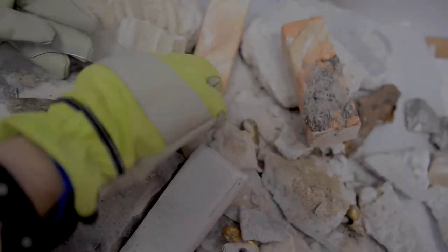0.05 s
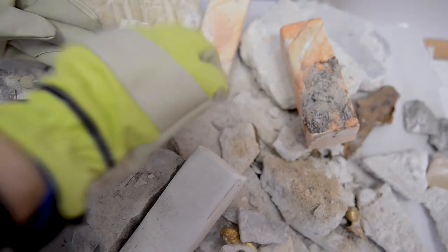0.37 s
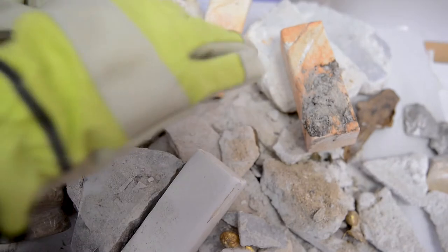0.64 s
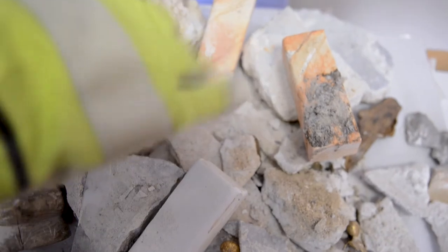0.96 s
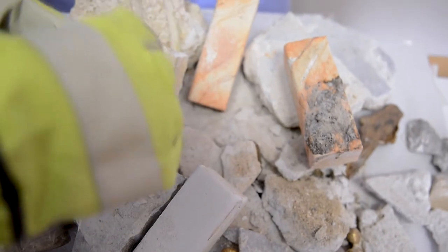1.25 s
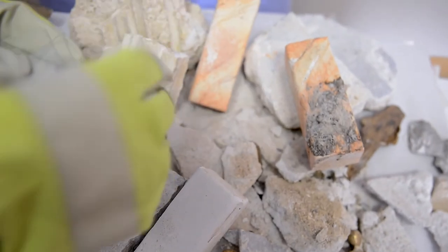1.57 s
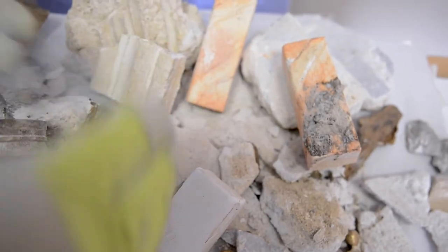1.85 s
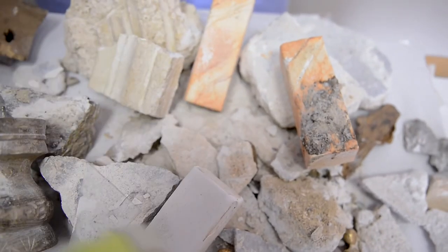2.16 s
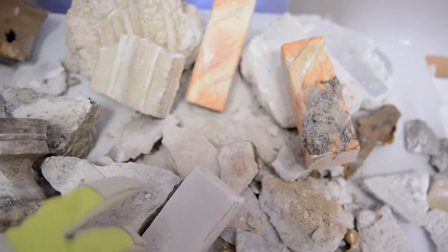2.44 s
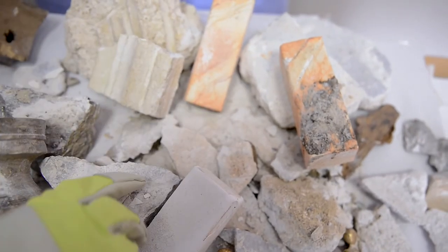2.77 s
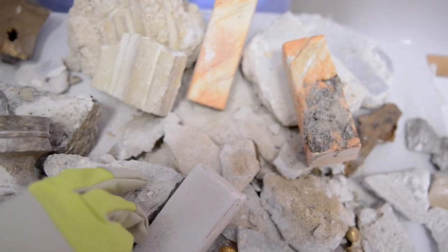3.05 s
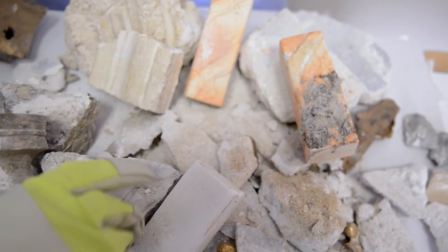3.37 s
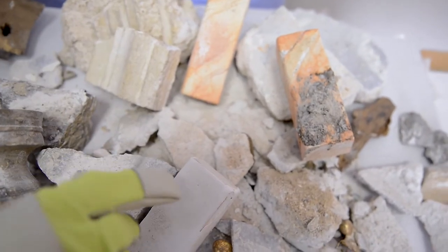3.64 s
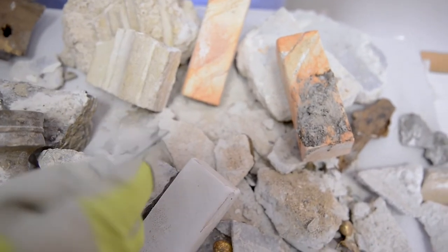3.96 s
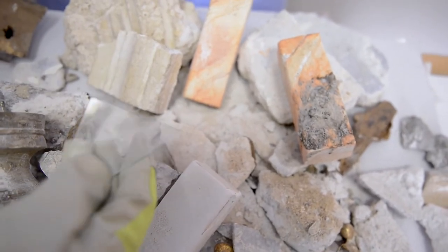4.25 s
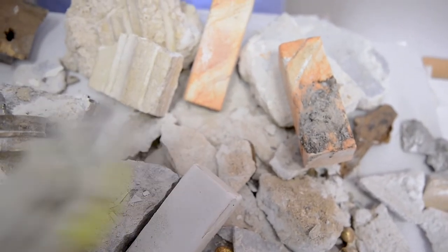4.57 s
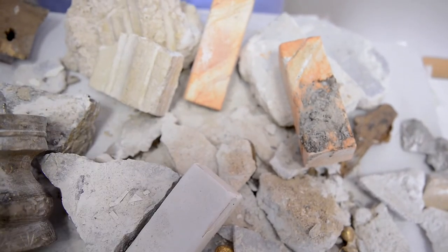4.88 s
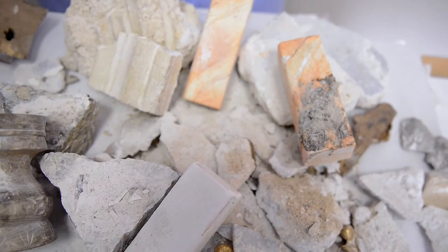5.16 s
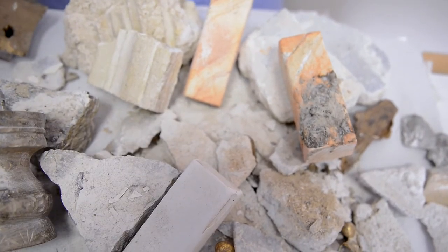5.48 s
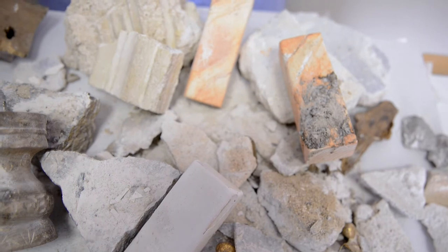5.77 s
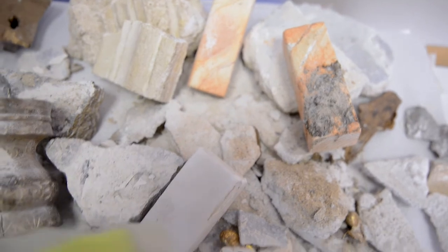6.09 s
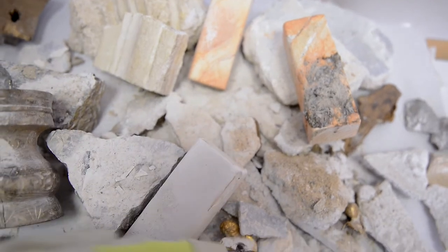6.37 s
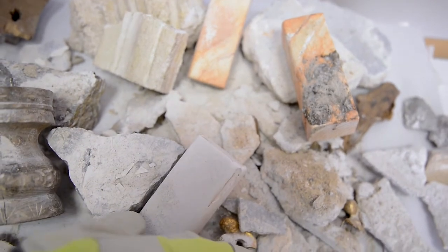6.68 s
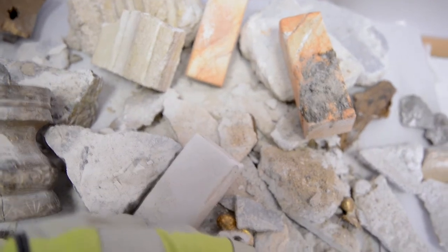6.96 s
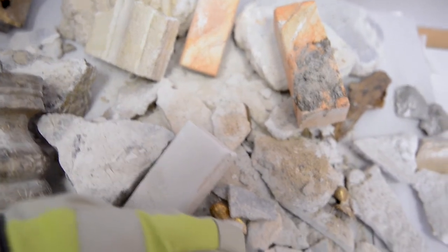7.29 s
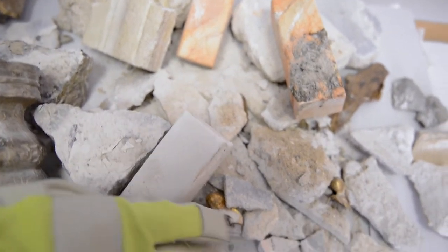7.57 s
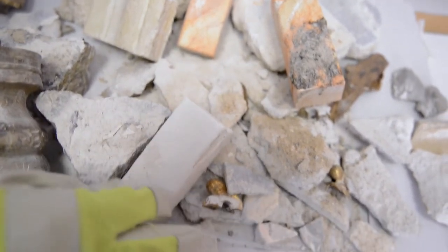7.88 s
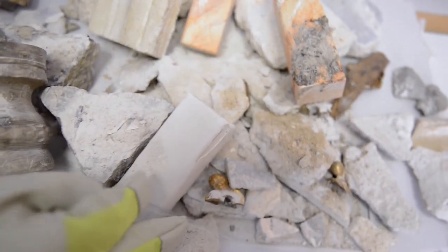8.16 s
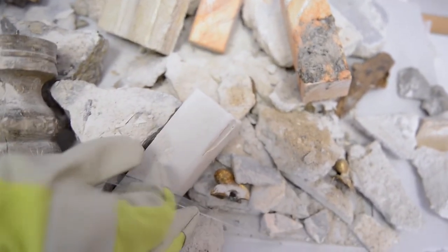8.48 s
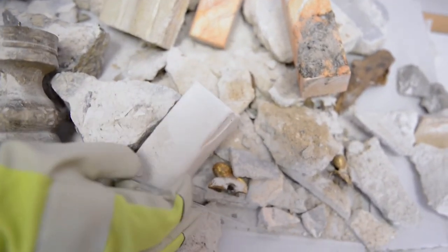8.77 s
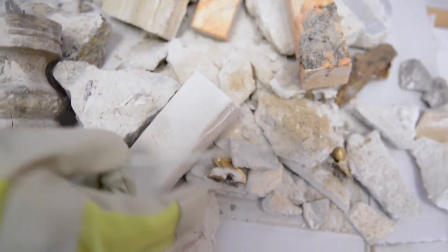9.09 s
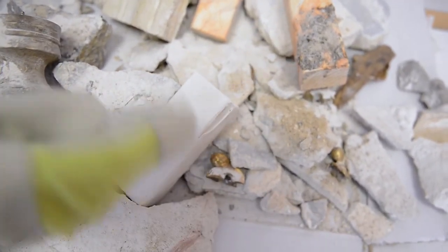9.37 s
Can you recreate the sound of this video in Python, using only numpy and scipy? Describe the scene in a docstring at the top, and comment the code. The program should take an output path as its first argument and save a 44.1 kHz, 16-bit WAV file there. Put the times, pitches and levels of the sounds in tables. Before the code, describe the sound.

Broken brick and plaster clack, clatter and scrape close by as a gloved hand sorts rubble in a tub.

```python
"""Sharp clacks and gritty scrapes, close by in a small room: a gloved hand sorts rubble in a tub.
Broken brick, tile and plaster knock together, crushing grains and ringing briefly; some bounce once.
Dropped pieces land, rock and skid to rest, and dragged ones rasp as their rough faces catch and slip.
Behind them the glove rustles, the tub booms softly when it is bumped, and the room hisses faintly."""
import sys
import numpy as np
from scipy import signal
from scipy.fft import rfft, irfft
from scipy.io import wavfile

SR = 44100
rng = np.random.default_rng(int(sys.argv[2]) if len(sys.argv) > 2 else 0)


def materialize(psi):
    """Save the field psi as 16-bit PCM at rate SR to the path in sys.argv[1].

    A 1-D psi becomes a single channel; in a 2-D psi each row is a channel.
    """
    bounded = np.clip(np.atleast_2d(psi).T, -1, 1)
    quanta = np.round(bounded * 32767).astype(np.int16)
    wavfile.write(sys.argv[1], SR, quanta)


N = 424683

# Tone of the steady room noise: pitch_hz, level_db
AIR = [(25, -9), (110, -4.5), (190, 0), (300, -6), (1000, -6.5), (2000, -5), (4500, -13), (8300, -9.5),
       (13000, -21.5), (16000, -29)]
# Tones the tub rings with (t60 is the time to fade by 60 dB): pitch_hz, level_db, t60_s
TUB = [(180, 10.8, 0.059), (226, 1.3, 0.39), (305, 2.1, 0.26)]
# The arm nudges the tub, which wobbles for a moment: start_s, length_s, level_db
BUMPS = [(6.333, .17, -47.5), (6.849, .03, -46.5), (7.984, .03, -46.5), (8.096, .18, -46),
         (8.481, .03, -50), (8.591, .03, -50.5), (9.478, .12, -49)]
# The pile shifts dully under the hand: start_s, end_s, level_db
SHIFTS = [(.03, 0.574, -60.5), (0.717, 0.79, -54.5), (1.363, 1.593, -56)]
# Tones each kind of piece rings with when it lies loose: pitch_hz, level_db, t60_s
BRICK = [(2309, -3, .088), (3348, 1, .16), (4436, -1, .1), (6417, -1, .22), (8700, -3, .07),
         (10410, -2, .16), (13510, -5, .09)]
CHIP = [(4700, -8, .08), (7130, -1, .11), (8890, 0, .09), (9900, -2, .12)]
SLAB = [(1620, -1, .07), (2000, -1, .08), (2370, -8, .25), (3070, -5, .12), (4764, -4, .11), (5338, -4, .3),
        (6290, -3, .2), (7617, -2, .16), (9211, -4, .25)]
TILE = [(1600, -4, .1), (1962, 3, .18), (4557, -4, .2), (5007, -3, .28), (6000, -4, .23), (7277, -5, .28),
        (8441, -6, .25), (8880, -6, .22), (9615, -7, .22)]
PLASTER = [(1460, 3, .13), (2400, -3, .05), (4010, -7, .1), (5340, -4, .12), (7530, -2, .13),
           (8090, 0, .13)]
SHARD = [(1620, 1, .09), (1890, -4, .12), (3060, -9, .2), (4309, -6, .36), (6004, -8, .2), (7750, -5, .26),
         (8357, -1, .22), (8880, -4, .14)]
EDGE = [(2240, 2, .1), (4517, -1, .25), (7360, -3, .13), (7725, -3, .16), (8699, 0, .1), (11020, -1, .12)]
# The piece that is moving: until_s, tones, thud_db, clack_db, looseness
# Looseness 1 rings freely; 0.2 is muffled by the grip or the pile.
HANDLED = [(.145, BRICK, -0.5, -0.5, 0.13), (.47, BRICK, -1, 5.5, 0.58), (.9, BRICK, -7, 0.5, 0.15),
           (1.17, CHIP, 5, 10, 0.53), (2.3, CHIP, -2.5, 2, 0.16), (3.06, BRICK, 4, 5, 0.42),
           (4.83, BRICK, -7, 1, 0.24), (4.915, SLAB, -7.5, 1, 0.65), (5.025, SHARD, -10, -2.5, 0.61),
           (5.555, SLAB, -16, -1, 0.37), (6.1, TILE, -10.5, -1.5, 0.51), (7.3, EDGE, -4.5, 4, 0.27),
           (10, PLASTER, -1, 1.5, 0.16)]
# Rough faces dragged over each other: start_s, end_s, level_db, brightness_db
SLIDES = [(0.318, 0.459, -37.5, 2.5), (1.038, 1.09, -36.5, 10), (2.451, 2.59, -67, -3),
          (2.94, 3.039, -45.5, -3), (3.123, 3.222, -46, -1), (3.361, 3.508, -44, 0.5),
          (3.644, 3.823, -40.5, -1.5), (4.26, 4.5, -42, -1), (4.493, 4.547, -36, -1),
          (4.761, 4.88, -47.5, -4), (5.351, 5.485, -41, -6.5), (6.673, 6.866, -42.5, -5),
          (7.67, 7.94, -49, -6), (7.926, 8.114, -42, -1), (8.212, 8.39, -49, -6.5),
          (8.78, 8.942, -45.5, 0.5)]
# Pieces meet, bright on a corner, dull on a flat face: start_s, level_db, brightness_db, bounce_after_s
KNOCKS = [(0.1646, -24, -2, 0), (0.4117, -28.5, 4.5, 0.039), (0.489, -26.5, 13.5, 0.02),
          (1.261, -35.5, 9.5, 0.0055), (1.3897, -32, 2, 0.015), (1.4455, -27.5, 14, 0),
          (1.621, -43, 29, 0.028), (2.012, -42.5, 24, 0.02), (2.8249, -40.5, -5.5, 0),
          (3.0791, -31, 8.5, 0.01), (3.407, -35, 12, 0), (3.5925, -38, 9.5, 0.01), (3.843, -38, 4.5, 0.027),
          (4.1214, -33, 11.5, 0), (4.413, -26.5, 10, 0.018), (4.939, -16, 2, 0), (5.1013, -25, 2.5, 0.0084),
          (5.2705, -19.5, 0.5, 0), (5.389, -30, -3, 0.0027), (5.5306, -36, -4, 0), (5.7196, -34.5, 2, 0.02),
          (6.6025, -36.5, 2.5, 0.0087), (6.696, -32, -8, 0.0052), (6.9981, -30.5, -16.5, 0.018),
          (7.1419, -18, 6, 0), (7.4194, -39, -9, 0), (7.632, -18.5, 9, 0), (7.745, -34.5, -19, 0),
          (8.0523, -32.5, 21, 0), (8.111, -33.5, -10, 0), (8.2042, -40, -19, 0.0049),
          (8.233, -32.5, -16, 0), (8.653, -36.5, -6.5, 0.013), (8.812, -34, -9, 0.046),
          (9.2141, -38.5, -2, 0.0073)]
# A piece is let go: start_s, level_db, brightness_db, first_rock_gap_s, skid_length_s, skid_db
DROPS = [(0.04, -21.5, 4, 0.012, 0.066, -32.5), (0.1203, -25, 3.5, 0.019, 0.071, -33),
         (0.7359, -27.5, 1.5, 0.0098, 0.041, -36.5), (1.07, -11.5, 15, 0.01, 0.022, -18),
         (4.5194, -21, 1.5, 0.023, 0.16, -41), (4.8715, -8.5, 0.5, 0.016, 0.079, -30.5),
         (4.9452, -8, 6, 0.019, 0.048, -18), (5.0014, -16, 0, 0.04, 0.07, -31),
         (5.581, -7, 3, 0.036, 0.099, -19.5), (7.5834, -20.5, 3.5, 0.013, 0.078, -25)]

KNOCK_HZ, CLACK_HZ, GRIT_HZ = 1250, 2640, 7320  # where the low, middle and high bands begin
DULL_HZ, TOP_HZ = 9350, 15700  # the grit softens above the first; all sound is cut above the second
KNOCK_CRUSH_S, DROP_CRUSH_S = .01, 0.024  # t60 of the grains crushed by a blow
MIN_BOUNCE_GAP_S = .008  # shorter gaps give a single knock with no bounce
AGE = np.arange(SR // 3) / SR  # seconds since a short sound began
FILTERS = {}


def undb(db):
    """Turn decibels into a number to multiply by."""
    return 10 ** (np.asarray(db) / 20)


def unit(x):
    """Scale a sound to an average (rms) strength of 1."""
    return x / np.sqrt(np.mean(x ** 2))


def fade(t60):
    """A curve that dies away, 60 dB down after t60 seconds."""
    return np.exp(-np.log(1000) * AGE / t60)


def keep_band(x, hz, kind, order=2):
    """Keep the lows, the highs or a band between; each filter is built once."""
    key = (str(hz), kind, order)
    if key not in FILTERS:
        FILTERS[key] = signal.butter(order, np.minimum(hz, SR / 2 - 1), kind, fs=SR, output="sos")
    return signal.sosfilt(FILTERS[key], x)


def add(track, start_s, x):
    """Mix x into the track from start_s."""
    i = int(start_s * SR)
    track[i:i + len(x)] += x[:N - i]


def ringing(tones, loose=1, spread_db=3, detune=0.0014):
    """A struck object's fading tones; each contact mixes them differently, and a grip shortens them."""
    out = np.zeros(len(AGE))
    for (hz, db, t60), (size, shift, side) in zip(tones, rng.standard_normal((len(tones), 3))):
        t = AGE[:int(t60 * loose * SR) + 2]
        strength = np.sign(side) * undb(db + spread_db * size)
        decay = np.exp(-np.log(1000) * t / t[-1])
        out[:len(t)] += strength * decay * np.sin(2 * np.pi * hz * (1 + detune * shift) * t)
    return out


def crumbs(count, per_s, spread_db):
    """Grains break at random moments, a few louder than the rest."""
    chance, size, sign = rng.random(count), rng.exponential(size=count), rng.standard_normal(count)
    return unit((chance < per_s / SR) * np.sign(sign) * undb(spread_db * np.minimum(size, 4)))


def stone(count=44, t60=0.028):
    """The piece that is struck: an uneven lump with many short tones of its own."""
    place, length = rng.random((2, count))
    edges_hz = np.linspace(24, 124, count + 1) ** 2  # tones crowd together toward the bass
    hz = edges_hz[:-1] + place * np.diff(edges_hz)
    tones = list(zip(hz, -8 * (hz < KNOCK_HZ), t60 * (.5 + length)))
    return ringing(tones, spread_db=5.5)


def piece_at(time_s):
    """Tones, thud_db, clack_db and looseness of the piece moving at this time."""
    return next(row[1:] for row in HANDLED if time_s < row[0])


def split_bands(x, thud_db):
    """Split a sound into low knock (with its thud), middle clack and high grit."""
    thud = undb(thud_db) * keep_band(keep_band(x, 153, "high", order=1), KNOCK_HZ, "low")
    knock = keep_band(keep_band(x, KNOCK_HZ, "high", order=4) - thud, CLACK_HZ, "low", order=4)
    clack = keep_band(keep_band(x, CLACK_HZ, "high", order=4), GRIT_HZ, "low", order=4)
    grit = keep_band(keep_band(x, GRIT_HZ, "high", order=4), DULL_HZ, "low", order=1)
    return knock, clack, grit


def balance(x, thud_db, db, bright_db, clack_db, span):
    """Set a sound to level db over the span; brightness raises the grit and lowers the knock."""
    weights = undb([-bright_db, clack_db, bright_db])
    weights = undb(db) * weights / np.linalg.norm(weights)
    return sum(weight * band / band[span].std() for weight, band in zip(weights, split_bands(x, thud_db)))


def air(level_db=-53):
    """Steady room noise and hiss."""
    hz, db = np.transpose(AIR)
    all_hz = np.arange(N // 2 + 1) * SR / N
    colour = undb(np.interp(np.log(all_hz + 1), np.log(hz), db))
    return undb(level_db) * unit(irfft(rfft(rng.standard_normal(N)) * colour, N))


def room(x, echo_db=-13, low_t60=0.27, high_t60=0.043):
    """A small room adds a blur of echoes whose treble dies first."""
    noise = rng.standard_normal(len(AGE))
    low = keep_band(noise, 3300, "low", order=1)
    tail = (low * fade(low_t60) + (noise - low) * fade(high_t60)) * (1 - np.exp(-AGE / 0.0006))
    return x + undb(echo_db) * signal.fftconvolve(x, tail / np.linalg.norm(tail))[:N]


def tub(wobble_s=0.055, jitter_s=0.00398, ring_db=-2, murmur_db=-1, murmur_hz=(125, 330)):
    """Soft, uneven bumps make the tub boom and jostle its load; the shifting pile rumbles in it."""
    out = np.zeros(N)
    rise = 1 - np.exp(-AGE / 0.0042)
    for start, length_s, db in BUMPS:
        for bump_s in np.arange(start, start + length_s, wobble_s):
            boom = undb(ring_db) * ringing(TUB, spread_db=0, detune=0.0074)
            jostle = unit(keep_band(rng.standard_normal(len(AGE)), murmur_hz, "band"))
            murmur = undb(murmur_db) * jostle * fade(t60=0.2)
            add(out, bump_s + jitter_s * rng.standard_normal(), undb(db) * (boom + murmur) * rise)
    for start, end, db in SHIFTS:
        count = max(int((end - start) * SR), SR // 50)
        rumble = unit(keep_band(rng.standard_normal(count), [60, 220], "band"))
        add(out, start, undb(db) * rumble * signal.windows.tukey(count, .5))
    return out


def glove(rustle_db=-61, clack_db=-3, grit_db=-1, tick_db=-64, tick_hz=(5200, 11000), reach_s=0.19):
    """Cloth rustles and stray crumbs tick wherever the hand is busy."""
    touches = np.zeros(N)
    touches[[int(row[0] * SR) for row in [*KNOCKS, *DROPS, *SLIDES]]] = 1
    busy = np.tanh(signal.fftconvolve(touches, signal.windows.hann(int(2 * reach_s * SR)), "same") / 2)
    catches = unit(signal.fftconvolve(abs(crumbs(N, per_s=70, spread_db=5)), fade(.025))[:N])
    knock, clack, grit = split_bands(rng.standard_normal(N) * (.5 + catches) * busy, thud_db=4)
    rustle = unit(knock) + undb(clack_db) * unit(clack) + undb(grit_db) * unit(grit)
    ticks = signal.fftconvolve(crumbs(N, per_s=18, spread_db=3.5), stone(t60=.008))[:N]
    ticks = keep_band(ticks, tick_hz, "band", order=1) * busy
    return undb(rustle_db) * rustle + undb(tick_db) * unit(ticks)


def glove_swish(start_s=9.2, end_s=9.6, db=-46, band_hz=(1200, 3200)):
    """The glove pulls away, its cloth swishing softly over the plaster."""
    out, count = np.zeros(N), int((end_s - start_s) * SR)
    swish = unit(keep_band(rng.standard_normal(count), band_hz, "band", order=1))
    add(out, start_s, undb(db) * swish * signal.windows.hann(count))
    return out


def scrape(start, end, db, bright_db, taper, ring_db, pressed, catches_per_s=130, rub=0.68, clack_db=0.5):
    """Rough faces catch and slip, crushing grit and ringing the piece. Gives (start_s, sound)."""
    tones, thud_db, _, loose = piece_at((start + end) / 2)
    count = max(int((end - start) * SR), SR // 50)
    catches = abs(crumbs(count, max(catches_per_s, 10 * SR / count), spread_db=2.9))
    slips = unit(signal.fftconvolve(catches, fade(t60=0.012))[:count])
    force = rng.standard_normal(count) * (rub + slips) * signal.windows.tukey(count, taper)
    body = undb(ring_db) * unit(ringing(tones, pressed * loose, spread_db=2)) + unit(stone())
    rasp = undb(-2.5) * unit(np.pad(force, (0, len(AGE) - 1)))
    sound = unit(signal.fftconvolve(force, body)) + rasp
    return start, balance(sound, thud_db, db, bright_db, clack_db, slice(count))


def slides(skid_after_s=.006, skid_dull_db=-1.5):
    """Dragged pieces swell and fade; dropped ones skid just after they land."""
    out = np.zeros(N)
    for start, end, db, bright_db in SLIDES:
        add(out, *scrape(start, end, db, bright_db, taper=0.36, ring_db=-1.5, pressed=0.35))
    for start, _, bright_db, _, length_s, db in DROPS:
        add(out, *scrape(start + skid_after_s, start + length_s, db, bright_db + skid_dull_db,
                         taper=0.57, ring_db=3.5, pressed=0.47))
    return out


def blow(start_s, db, bright_db, crush_t60, crack_db=-2, trickle_db=-22, ring_db=4, graze_db=-20):
    """Edges graze, grains are crushed, both pieces ring and crumbs trickle. Gives (start_s, sound)."""
    head, lead = slice(SR // 125), SR // 250  # the first 8 ms of the hit; the 4 ms before it
    tones, thud_db, clack_db, loose = piece_at(start_s)
    crush = crumbs(len(AGE), per_s=9000, spread_db=0.64) * fade(crush_t60)
    trickle = undb(trickle_db) * crumbs(len(AGE), per_s=1200, spread_db=10) * fade(t60=0.22)
    grains = crush + trickle
    struck = signal.fftconvolve(grains, stone())[:len(AGE)]
    parts = [(1, struck), (undb(crack_db), grains), (undb(ring_db) * loose, ringing(tones, loose))]
    rise = 1 - np.exp(-AGE / 0.00022)
    hit = sum(gain * part / part[head].std() for gain, part in parts) * rise
    hit = balance(hit, thud_db, db, bright_db, clack_db, head)
    scratch = keep_band(crumbs(lead, per_s=9900, spread_db=2), CLACK_HZ, "high")
    graze = undb(db + graze_db) * unit(scratch * np.linspace(0, 1, lead))
    return start_s - lead / SR, np.concatenate([graze, hit])


def knocks(bounce_db=-2.5, bounce_dull_db=-8):
    """One piece hits another; some bounce once, weaker and duller."""
    out = np.zeros(N)
    for start, db, bright_db, after_s in KNOCKS:
        add(out, *blow(start, db, bright_db, KNOCK_CRUSH_S))
        if after_s > MIN_BOUNCE_GAP_S:
            add(out, *blow(start + after_s, db + bounce_db, bright_db + bounce_dull_db, KNOCK_CRUSH_S))
    return out


def drops(rocks=4, rock_db=-6, rock_dull_db=-0.5, gap_ratio=.93, overload_db=-29, overload_hz=110):
    """A piece lands, then rocks from edge to edge, each tap sooner, weaker and duller."""
    out = np.zeros(N)
    overload_shape = fade(t60=0.042) * (1 - np.exp(-AGE / 0.0021))
    for start, db, bright_db, gap_s, _, _ in DROPS:
        add(out, *blow(start, db, bright_db, DROP_CRUSH_S))
        # A dull low thump, like an overloaded microphone, comes with each drop.
        thud_db = piece_at(start)[1]
        low_noise = unit(keep_band(rng.standard_normal(len(AGE)), overload_hz, "low", order=1))
        add(out, start, undb(db + overload_db + thud_db) * low_noise * overload_shape)
        gaps_s = gap_s * gap_ratio ** np.arange(rocks)
        for k, after_s in enumerate(np.cumsum(gaps_s), 1):
            add(out, *blow(start + after_s, db + k * rock_db, bright_db + k * rock_dull_db, KNOCK_CRUSH_S))
    return out


def scene():
    """Rubble, glove and tub in the room."""
    return (air() + room(knocks() + drops() + glove() + slides() + glove_swish() + tub()))[None]


def record(dry, ceiling=0.58, lopsided=0.024):
    """Loud peaks overload the microphone, one side first, adding a dull thump; the top treble is cut."""
    rounded = ceiling * np.tanh(dry / ceiling)
    treble_cut = signal.ellip(8, .2, 80, TOP_HZ, fs=SR, output="sos")
    return signal.sosfilt(treble_cut, rounded + lopsided * rounded ** 2)


dry = scene()
out = record(dry)
materialize(out)
```